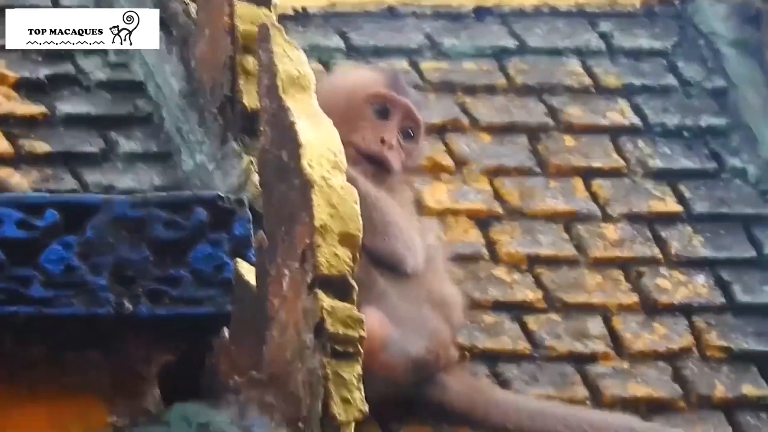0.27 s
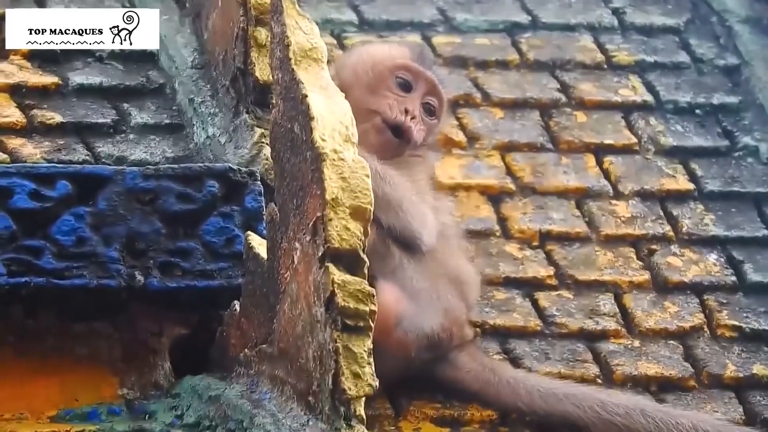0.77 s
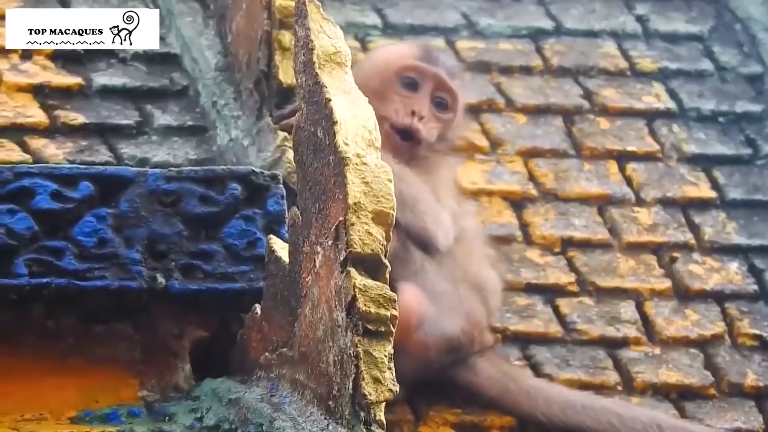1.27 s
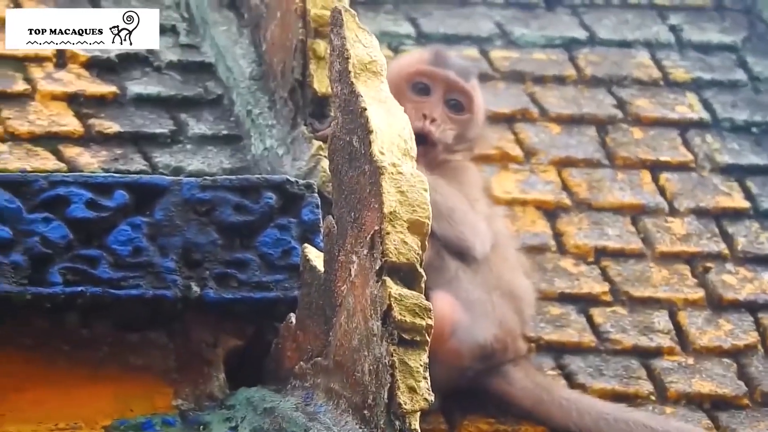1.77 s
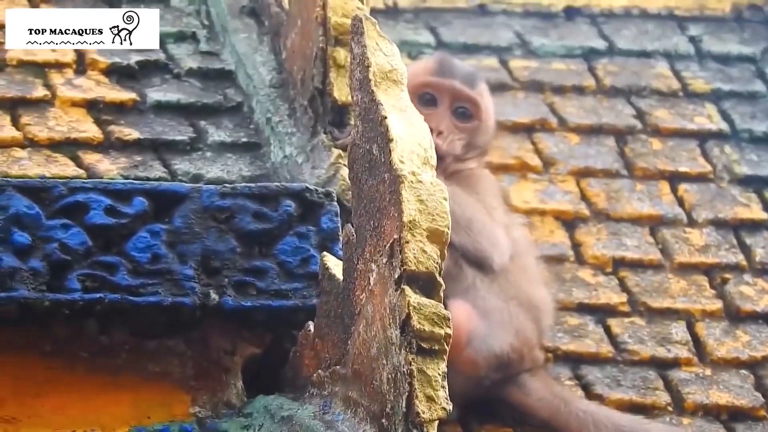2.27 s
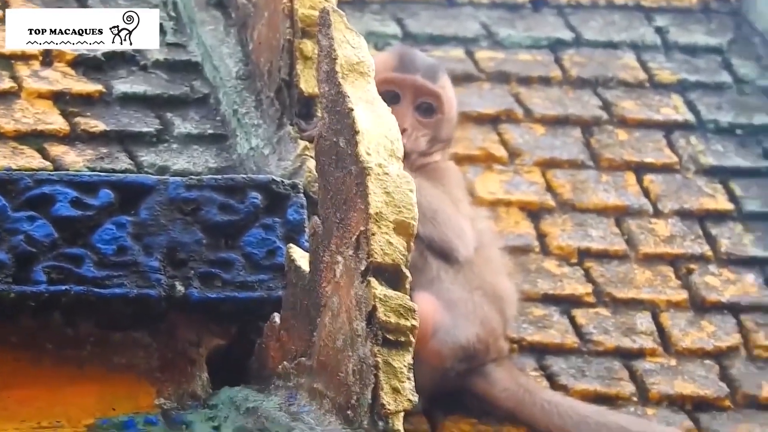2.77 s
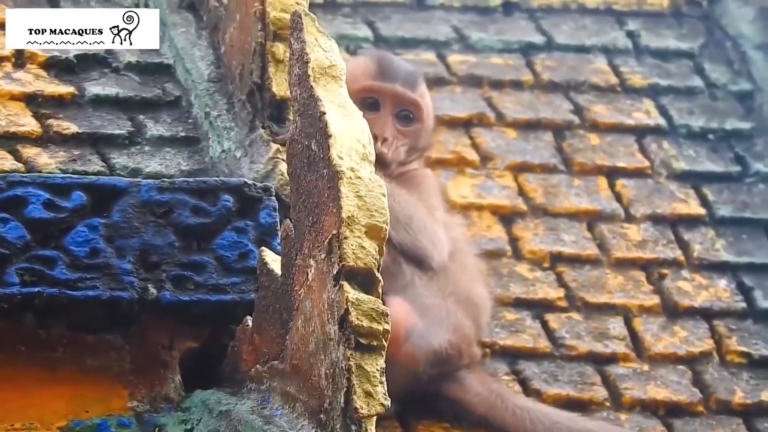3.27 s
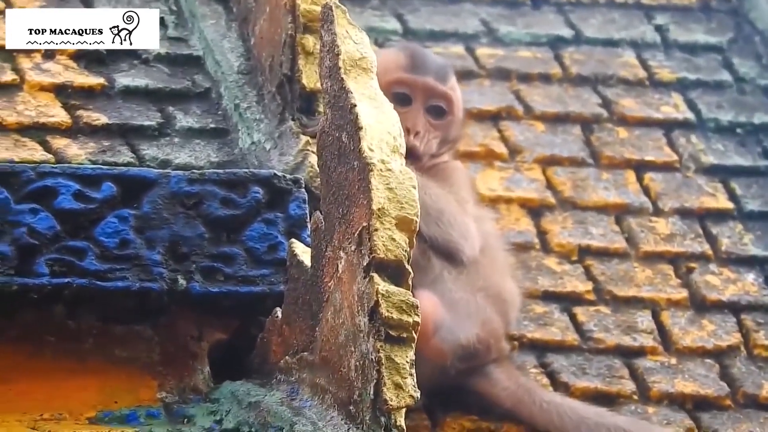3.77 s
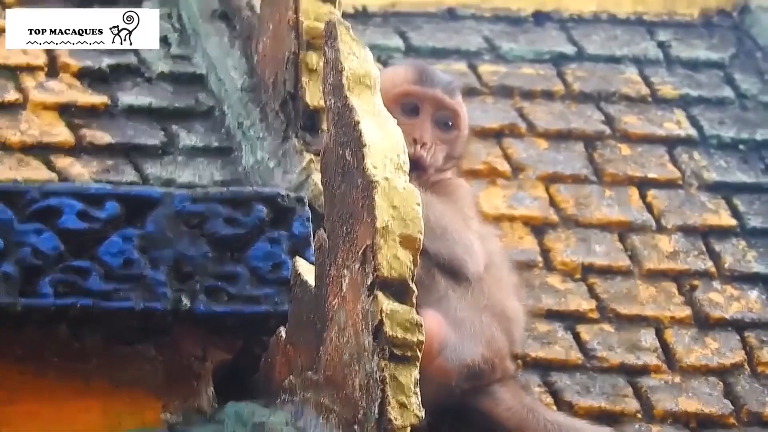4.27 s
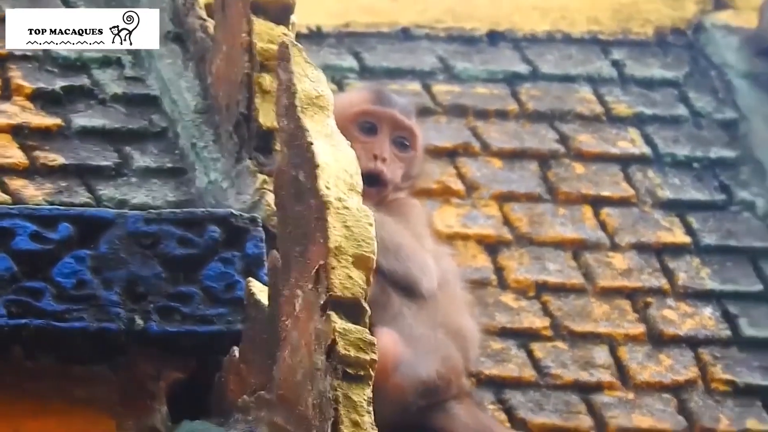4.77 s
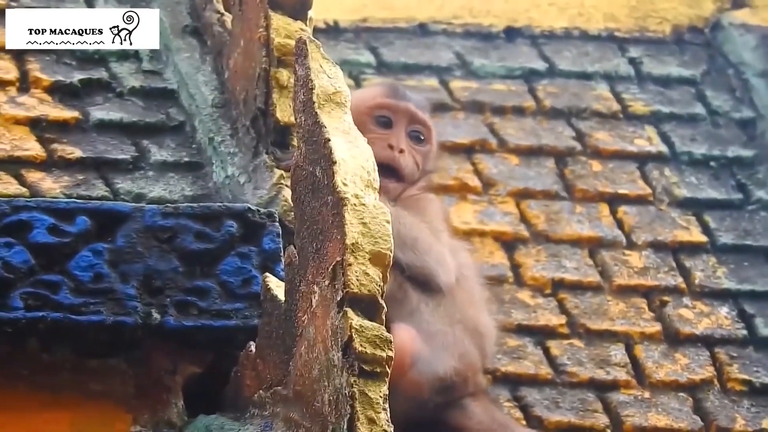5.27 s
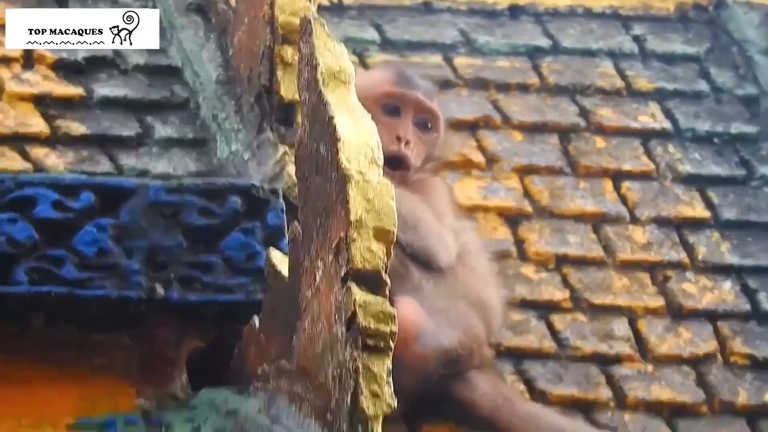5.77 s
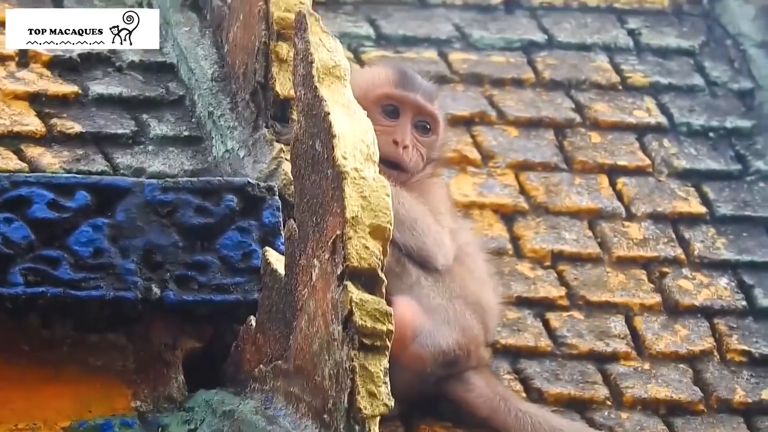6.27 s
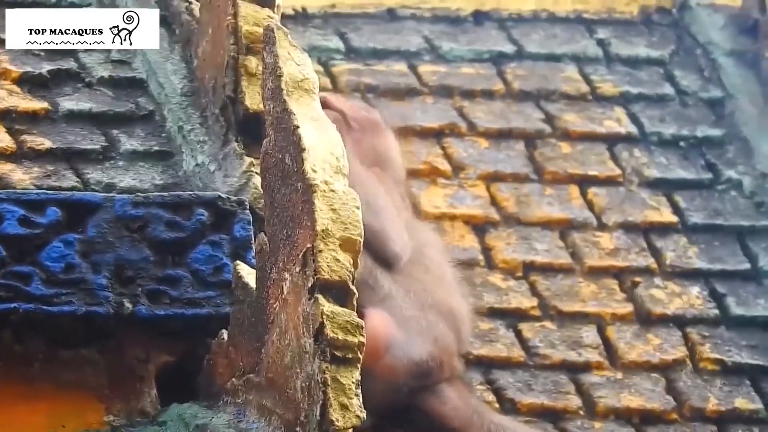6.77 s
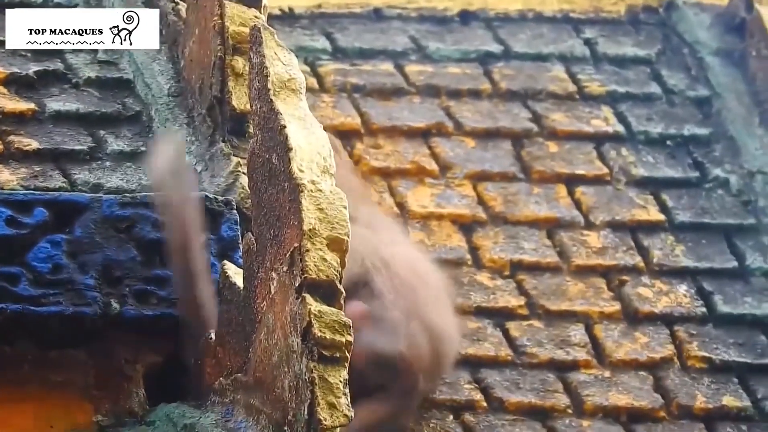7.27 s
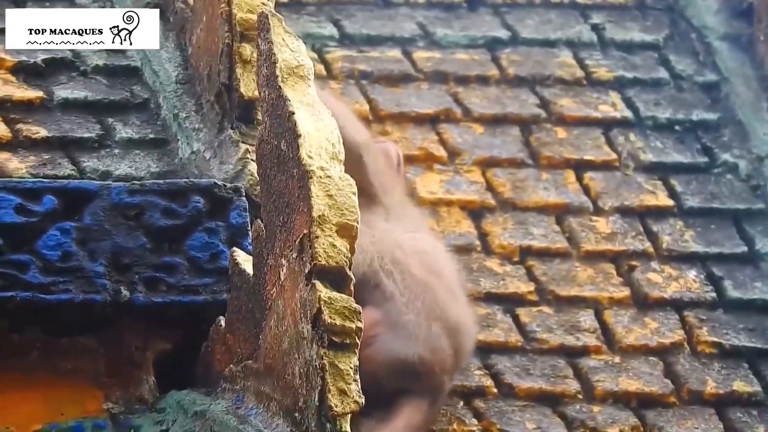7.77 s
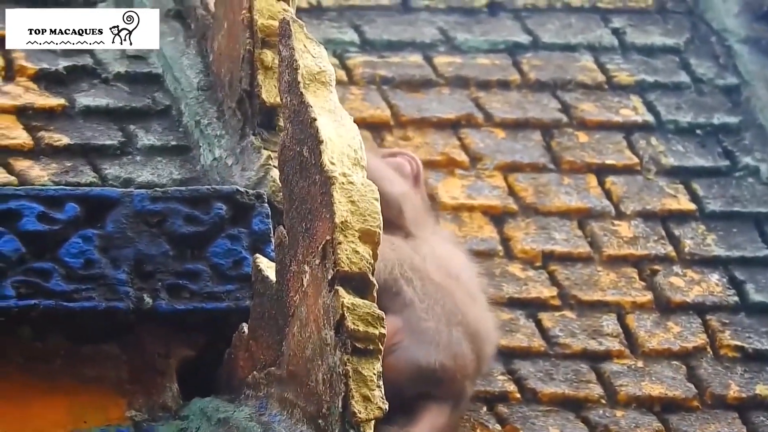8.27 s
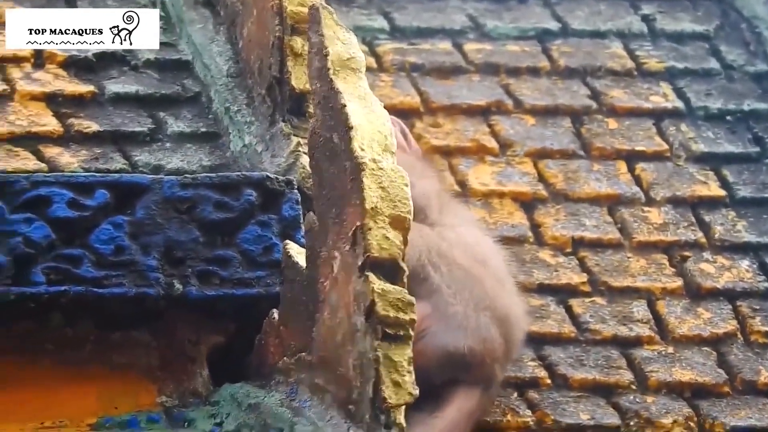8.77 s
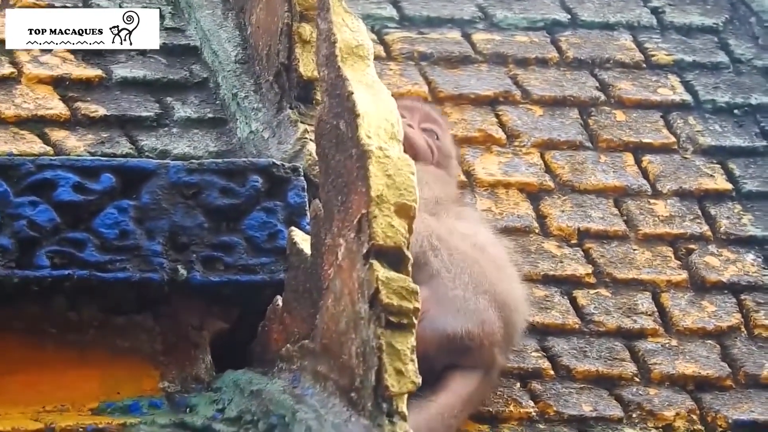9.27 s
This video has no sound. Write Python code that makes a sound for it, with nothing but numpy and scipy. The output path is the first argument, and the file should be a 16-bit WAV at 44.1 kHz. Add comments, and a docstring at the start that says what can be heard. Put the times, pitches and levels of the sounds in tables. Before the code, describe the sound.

A quiet outdoor yard: low soft rumble, faint narrow insect buzz, and a thin chirr fading within the first 0.4 seconds. A weak coo at 0.4 leads to clear, whistle-like monkey coos peaking near 0.85, 1.4, 1.9, 2.5, 3.1, 3.75 and 4.3, each arching up and down around 1.0 to 1.4 kHz with a strong octave overtone and small catches or cracks. Soft dull knocks appear sporadically; a dry tick sounds at 4.3. From 4.7 a strained coo climbs and roughens. At 5.2 to 5.7 the first scream leaps up, tears into hiss and falls hoarse. Airy hisses swell around 6 and 6.6, then a faint coo at 7. Harsh screams with tiny squeaks follow at 7.1, 7.7, 8.3, 8.8 and 9.5, with hissing between. Short echoes and a thin tail surround the calls.

```python
"""A young monkey on a tiled roof calls in arched, whistle-like coos, harmonic tones shaped by its throat,
then breaks into screams: two rough folds leap in pitch, tear into hiss and fall back rough.
Hisses are noise ringing two mouth resonances; squeaks are short glides of the screaming folds.
Insects, narrow throbbing noise bands, buzz over a low rumble, with soft knocks (scuffs ringing
modes) and dry ticks (noise bursts). Echoes and a diffuse tail surround all but this background."""
import sys
import numpy as np
from scipy import signal
from scipy.io import wavfile
from scipy.ndimage import uniform_filter1d

SR = 44100
rng = np.random.default_rng(int(sys.argv[2]) if len(sys.argv) > 2 else 0)


def log_audio(samples):
    """Write samples as a 16-bit WAV file to the path given in sys.argv[1]."""
    # one column per channel
    frames = np.atleast_2d(samples).T
    # limit to full scale, then quantise
    limited = np.clip(frames, -1, 1)
    pcm = np.round(limited * 32767).astype(np.int16)
    wavfile.write(sys.argv[1], SR, pcm)


N = 420273
T = np.arange(N) / SR
CUTOFF_HZ = 15300
FUNDAMENTAL_FADE_DB = 14  # how far a coo's fundamental weakens at its ends

# left-right likeness of a sound: frequency_hz, coherence (0-1)
LIKENESS = [(30, 1), (120, 1), (1000, 0.97), (3000, 1), (6500, 0.66), (9000, 0.8), (12000, 0.17)]


def from_db(db):
    """Level to amplitude: 20 dB is a factor of ten."""
    return 10 ** (np.asarray(db) / 20)


def rms_one(x):
    """Normalization: scale to unit mean power."""
    return x / np.sqrt(np.mean(x ** 2) + 1e-20)


def curves(rows, t):
    """Linear interpolation: each column of a table at the times t."""
    s, *columns = np.transpose(rows)
    return [np.interp(t, s, c) for c in columns]


def between(start, end):
    """Time axis: the sample times from start to end."""
    return T[(T >= start) & (T <= end)]


def ramp(t, start, length_s):
    """Linear onset: 0 before start, rising to 1 over length_s."""
    return np.clip((t - start) / length_s, 0, 1)


def blend(a, b, share):
    """Crossfade: go from a to b as share goes from 0 to 1."""
    return a + (b - a) * share


def span(rows, fade_s):
    """Gating: the samples that a table covers, their times, and a soft gate."""
    at = np.flatnonzero((T >= rows[0][0]) & (T <= rows[-1][0]))
    t = T[at]
    gate = np.clip(np.minimum(t - t[0], t[-1] - t) / fade_s, 0, 1)
    return at, t, gate


def at_hz(points, hz):
    """Spectral envelope: read a spectrum on a log-frequency axis."""
    f, value = np.transpose(points)
    return np.interp(np.log(hz), np.log(f), value)


def lowpass(x, order, hz):
    """Low-pass filtering: treble above hz is weakened."""
    return signal.sosfilt(signal.butter(order, hz, fs=SR, output="sos"), x)


def bandpass(x, order, low_hz, high_hz):
    """Band-pass filtering: only the band between two edges stays strong."""
    return signal.sosfilt(signal.butter(order, [low_hz, high_hz], "band", fs=SR, output="sos"), x)


def wander(rate_hz, size):
    """Random modulation: low-passed noise of unit rms."""
    # the first tenth of a second lets the filter settle
    noise = rng.standard_normal(size + SR // 10)
    return rms_one(lowpass(noise, 2, min(rate_hz, SR / 4))[-size:])


def noise_band(hz, width_hz, shape):
    """Resonance: white noise through one broad band, unit rms."""
    low, high = np.clip([hz - width_hz / 2, hz + width_hz / 2], 10, SR / 2 - 10)
    return rms_one(bandpass(rng.standard_normal(shape), 2, low, high))


def widen(mid, side, hz):
    """Interaural coherence: two unrelated sounds become partly alike left and right signals."""
    alike = np.clip(at_hz(LIKENESS, hz), 0, .985)
    return np.sqrt((1 + alike) / 2) * mid + np.sqrt((1 - alike) / 2) * side * np.array([[1], [-1]])


def coloured_noise(spectrum, patchy_db, patchy_hz, count):
    """Filter bank: stereo noise bands follow a spectrum, each flickering by itself; unit rms."""
    edges = np.geomspace(spectrum[0][0], min(spectrum[-1][0], CUTOFF_HZ), count)
    white = rng.standard_normal((2, 2, N))
    out = 0
    for k, (low, high) in enumerate(zip(edges, edges[1:])):
        hz = np.sqrt(low * high)
        # neighbouring bands draw on different noise
        band = bandpass(white[k % 2], 3, low, high)
        gains = from_db(at_hz(spectrum, hz) + patchy_db * rng.standard_normal(size=4096))
        flicker = np.interp(T * patchy_hz, np.arange(len(gains)), gains)
        out = out + flicker * widen(*band, hz)
    return rms_one(out)


def partial(phase, hz, spread=0.49):
    """Interaural phase: one sine at both ears, skewed further where the ears are less alike."""
    skew = spread * np.arccos(np.clip(at_hz(LIKENESS, hz), 0, 1)) / 2
    return np.array([np.sin(phase + skew), np.sin(phase - skew)])


def rumble(level_db=-46):
    """Broadband noise: the outdoor ambience is strongest in the bass."""
    # steady background spectrum: frequency_hz, relative_density_db (per Hz)
    ambience = [(25, -36.5), (42, -15), (64, -6.5), (105, -2), (170, -7), (260, -12), (460, -15.5),
                (760, -25.5), (1000, -22), (1600, -34.5), (2800, -36.5), (4400, -46)]
    return from_db(level_db) * coloured_noise(ambience, patchy_db=4.5, patchy_hz=14, count=26)


def high_air(level_db=-65):
    """Broadband noise: a faint, steady treble band."""
    return from_db(level_db) * widen(*noise_band(5100, 6000, (2, N)), 5500)


def chorus(hz, width_hz, level_db, throb_db=1.0):
    """Incoherent superposition: many small sounds merge into one narrow, throbbing noise band."""
    throb = from_db(level_db + throb_db * wander(37, N))
    return throb * widen(*noise_band(hz, width_hz, (2, N)), hz)


def insects():
    """Incoherent superposition: a high chorus keeps on while a lower one swells and sinks."""
    # level of the lower chorus: time_s, level_db
    low_swell = [(0, -58.5), (.9, -59), (1.1, -68.5), (2.8, -71), (3.1, -53.5), (3.4, -65.5), (4.3, -59),
                 (4.7, -79)]
    high = chorus(hz=6583, width_hz=486, level_db=-51.5)
    low = chorus(hz=5020, width_hz=610, level_db=0) * from_db(curves(low_swell, T)[0])
    return high + low


def chirr():
    """Band-limited noise: a thin chirr in two bands fades away."""
    # bands of the chirr: centre_hz, width_hz, relative_level_db
    chirr_bands = [(3650, 640, -1), (7900, 1700, -11)]
    # fading of the chirr: time_s, level_db
    chirr_fade = [(0, -38), (0.081, -51.5), (.2, -62.5), (.4, -90)]
    return sum(chorus(*band) for band in chirr_bands) * from_db(curves(chirr_fade, T)[0])


def background():
    """Superposition: far rumble, a little high air, the insects and the chirr."""
    return rumble() + high_air() + insects() + chirr()


def burst(s, t60):
    """Exponential decay: an envelope jumps up at s and falls 60 dB in t60 seconds."""
    return (T >= s) * from_db(-60 * np.clip((T - s) / t60, 0, 2))


def knocks(scuff_t60=0.11, scuff_db=4.5, modes_db=3.5):
    """Modal synthesis: each knock is a short, dull scuff that rings a few damped modes."""
    # soft knocks, and one faint low puff at 6.37 s made the same way: start_s, relative_level_db
    knock_times = [(0.17, -42), (0.865, -39.5), (0.972, -46), (1.207, -41.5), (1.241, -37.5),
                   (1.864, -37.5), (2.388, -44), (5.38, -43), (6.371, -49.5), (6.525, -50.5), (7.16, -42.5),
                   (9.064, -42.5)]
    # modes that ring: frequency_hz, relative_level_db, t60_s
    knock_modes = [(335, -5, 0.055), (488, 1.5, 0.034), (695, -7.5, 0.063), (953, -6, 0.049),
                   (1120, 10.5, 0.0036), (1486, -7.5, 0.11), (1974, -17.5, 0.24)]
    envelope = sum(from_db(db) * burst(s, scuff_t60) for s, db in knock_times)
    contact = envelope * rng.standard_normal(N)
    out = from_db(scuff_db) * bandpass(contact, 2, 300, 1900)
    # a longer scuff would drive the modes harder, so its length is divided out
    drive = contact / np.sqrt(scuff_t60 * SR / np.log(1e6))
    for hz, db, t60 in knock_modes:
        radius, angle = from_db(-60 / (t60 * SR)), 2 * np.pi * hz / SR
        resonator = [1, -2 * radius * np.cos(angle), radius * radius]
        ring = signal.lfilter([0, np.sin(angle)], resonator, drive + 1e-18)
        out = out + from_db(db + modes_db) * ring
    return out


def arch(start, top, end, start_hz, top_hz, end_hz, level_db, swell_db, first_db, dip_db, overtones_db,
         mouth):
    """Vocal effort: it rises and slackens, and pitch and level follow it.

    Columns: time_s, pitch_hz, second_harmonic_db, fundamental_db, overtones_db, mouth (0-1), roughness (0-1)."""
    t = between(start, end)
    away = np.where(t < top, (top - t) / (top - start), (t - top) / (end - top))
    # a rounded top with steep ends
    slack = blend(away ** 7.3, away ** 1.7, 0.65)
    pitch = blend(top_hz, np.where(t < top, start_hz, end_hz), slack)
    dip = dip_db * np.exp(-(slack / 0.062) ** 2)
    fundamental_db = first_db - FUNDAMENTAL_FADE_DB * slack ** 2 - dip
    # the coo dies away as the breath runs out
    release_s, release_db = 0.03, 16.5
    second_db = level_db - swell_db * slack - release_db * ramp(t, end - release_s, release_s)
    columns = t, pitch, second_db, fundamental_db, overtones_db, mouth, 0
    return np.column_stack(np.broadcast_arrays(*columns))


def coo(rows, shimmer_db=2.0):
    """Source and filter: the throat resonance favours the second harmonic; strain adds side tones."""
    # throat shape in a coo: frequency_hz, gain_db
    coo_throat = [(2000, 2), (2400, 10), (2800, 14.5), (3300, 8.5), (3700, -15), (4200, -17.5), (5400, -26),
                  (6100, -22), (6800, -11), (8200, -36.5), (10500, -37), (12300, -33.5), (14000, -58)]
    at, t, gate = span(rows, fade_s=.014)
    size = len(t)
    pitch, second_db, first_db, overtones_db, mouth, rough = curves(rows, t)
    # under strain the folds wobble every few cycles
    flutter_hz = 0.28 * pitch * (1 + 0.09 * wander(200, size))
    flutter = rough * np.sin(2 * np.pi * np.cumsum(flutter_hz) / SR)
    bent = pitch * (1 + 0.0036 * wander(110, size) + 0.14 * flutter)
    phase = 2 * np.pi * np.cumsum(bent) / SR
    tone = from_db(first_db + 4.0 * wander(19, size)) * partial(phase, pitch)
    # near the top of the arch, fold tension tilts the overtones
    tilt_db = -np.log2(np.clip(pitch, 1300, 1440) / 1380)
    for k in range(2, 11):
        # a half-closed mouth flattens the resonances; higher harmonics waver more
        throat_db = mouth * (at_hz(coo_throat, k * pitch) - at_hz(coo_throat, 2 * pitch))
        waver_db = shimmer_db * (k / 2) ** 0.54 * wander(19, size)
        level_db = second_db + throat_db + waver_db + overtones_db * (k > 2) + tilt_db * np.log2(k / 2)
        tone += from_db(level_db) * partial(k * phase, k * pitch)
    # strain also brings a line between the first two harmonics, and irregular snaps
    half_line = partial(1.5 * phase, 1.5 * pitch)
    tone += from_db(second_db) * rough * from_db(-13) * (half_line + breaks(size))
    return at, np.sqrt(2) * gate * tone * (1 + 0.4 * flutter)


def catch(start, end, from_hz, to_hz, level_db, swell_db=12, jitter=0.013, shimmer_db=3.0):
    """Period doubling: strong and weak cycles alternate, giving lines at half multiples of the pitch."""
    # throat shape as the voice catches: frequency_hz, gain_db
    catch_throat = [(1050, -7), (1600, -15), (2100, -6.5), (2700, -1.5), (3200, 1), (3700, -25),
                    (4400, -23)]
    rows = [(start, from_hz, level_db - swell_db), (end, to_hz, level_db)]
    at, t, gate = span(rows, fade_s=.004)
    pitch, db = curves(rows, t)
    phase = 2 * np.pi * np.cumsum(pitch * (1 + jitter * wander(120, len(t)))) / SR
    tone = 0
    for k in np.arange(2, 10) / 2:
        line_db = db + at_hz(catch_throat, k * pitch) + shimmer_db * wander(58, len(t))
        tone = tone + from_db(line_db) * partial(k * phase, k * pitch)
    return at, gate, np.sqrt(2) * gate * tone


def ticks(hz=5500, width_hz=5000, top_hz=9500, crack_t60=0.006, tail_t60=0.33, tail_db=-14):
    """Impulsive excitation: a bright, very short noise burst with a faint tail."""
    # dry ticks: start_s, relative_level_db
    tick_times = [(1.597, -42), (4.305, -21), (4.498, -43)]
    envelope = 0
    for s, db in tick_times:
        envelope = envelope + from_db(db) * (burst(s, crack_t60) + from_db(tail_db) * burst(s, tail_t60))
    return lowpass(envelope * widen(*noise_band(hz, width_hz, (2, N)), hz), 4, top_hz)


def breaks(size, hz=2950, width_hz=750):
    """Resonance under chaotic drive: irregular snaps of the folds, as noise, ring the throat."""
    return widen(*noise_band(hz, width_hz, (2, size)), hz)


def crack(start, end, hz, width_hz, level_db):
    """Chaotic vibration: for a moment the folds snap irregularly and ring the throat resonance."""
    at, t, gate = span([(start,), (end,)], fade_s=.005)
    return at, from_db(level_db) * gate * breaks(len(t), hz, width_hz)


def strain(attack_s=0.088):
    """Nonlinear phonation: a strained coo turns rough part way through; same columns as an arch."""
    # the coo that climbs out of the arch: time_s, pitch_hz, second_harmonic_db
    strained_coo = [(4.679, 1008, -56), (4.72, 1220, -40.5), (4.799, 1327, -26), (4.828, 1446, -23.5),
                    (4.884, 1467, -23), (4.92, 1524, -22.5), (4.944, 1622, -25), (4.983, 1650, -23),
                    (5.012, 1572, -22.5), (5.039, 1293, -32.5), (5.05, 1340, -34)]
    start, end = strained_coo[0][0], strained_coo[-1][0]
    t = between(start, end)
    pitch, second_db = curves(strained_coo, t)
    fundamental_db = -44 - FUNDAMENTAL_FADE_DB * (1 - ramp(t, start, attack_s)) ** 2
    rough = 0.14 * ramp(t, 4.8, 0.078)
    return np.column_stack(np.broadcast_arrays(t, pitch, second_db, fundamental_db, 0, 1, rough))


def cooing():
    """Voice registers: clear coos give way to a doubled vibration wherever the voice catches."""
    # arched coos: start_s, top_s, end_s, start_hz, top_hz, end_hz, second_harmonic_db, its swell_db,
    #   fundamental_db, its dip_db at the top, overtones_db, mouth opening (0-1)
    coos = [ (0.365, 0.559, 0.65, 960, 1176, 1153, -46.5, 17, -50.5, 0.5, -9.5, 1),
            (0.639, 0.848, 1.047, 1196, 1336, 1020, -24.5, 35, -43.5, 2.5, 0.5, 0.94),
            (1.222, 1.395, 1.585, 1070, 1381, 1072, -24.5, 23.5, -39.5, 27, -1, 0.81),
            (1.742, 1.941, 2.098, 1080, 1423, 1050, -21.5, 27.5, -43, 1, 2.5, 0.95),
            (2.263, 2.489, 2.667, 1040, 1416, 1065, -24, 29, -42, 1.5, 10.5, 1),
            (2.841, 3.119, 3.277, 1082, 1354, 1100, -25, 26.5, -43.5, -4.5, 7.5, 1),
            (3.458, 3.757, 3.9, 1067, 1391, 1055, -23, 30.5, -40.5, 13, 2.5, 0.94),
            (4.096, 4.328, 4.505, 1015, 1350, 1120, -25.5, 25, -41, -3, -0.5, 0.91),
            (6.897, 7.005, 7.08, 1000, 1211, 1240, -45, 24, -49.5, 10, 1, 0.72),
            (7.051, 7.103, 7.125, 1183, 1330, 1500, -52.5, -6, -44.5, 15, -1, 0.8), ]
    # the voice catches at the start of a coo: start_s, end_s, from_hz, to_hz, level_db
    catches = [(1.229, 1.262, 1053, 1200, -37), (2.255, 2.31, 1020, 1206, -39.5),
               (2.845, 2.906, 1032, 1196, -41), (3.457, 3.53, 1038, 1103, -40),
               (4.091, 4.166, 1036, 1065, -40)]
    # the voice cracks: start_s, end_s, centre_hz, width_hz, level_db
    cracks = [(2.38, 2.415, 3250, 250, -47), (2.934, 2.964, 3150, 300, -41), (2.977, 3.002, 3220, 250, -42),
              (3.501, 3.55, 2780, 744, -41.5), (3.578, 3.586, 3120, 300, -35),
              (4.127, 4.163, 2870, 647, -42), (4.207, 4.222, 3130, 250, -41.5)]
    # left-right balance of the coos: time_s, left_minus_right_db
    coo_balance = [(0.85, 1), (1.4, 1), (1.93, -0.7), (2.48, 0), (3.1, 1), (3.7, 0.5), (4.3, 0), (4.9, 0)]
    out = np.zeros((2, N))
    for at, sound in [coo(arch(*row)) for row in coos] + [coo(strain(), shimmer_db=1.7)]:
        out[:, at] += sound
    for row in catches:
        at, gate, sound = catch(*row)
        out[:, at] = (1 - gate) * out[:, at] + sound
    for row in cracks:
        at, sound = crack(*row)
        out[:, at] += sound
    return out * from_db(curves(coo_balance, T)[0] * np.array([[.5], [-.5]]))


def hissing(lower_width_hz=600, upper_width_hz=1000, swing_db=37.5):
    """Turbulence: air rushes through the open mouth and rings two resonances that shift by grimace."""
    # voiceless hisses: peak_s, rise_s, fall_s, lower_resonance_hz, its level_db,
    #   upper_resonance_hz, its level_db, broad_rush_db
    hisses = [ (5.02, 0.19, 0.31, 3100, -42.5, 7500, -54, -47),
              (5.66, 0.036, 0.94, 3090, -43, 8000, -41.5, -40.5),
              (5.994, 0.66, 0.28, 3440, -59, 6780, -32, -36.5),
              (6.05, 0.28, 0.31, 3740, -36, 6300, -36.5, -35.5),
              (6.601, 0.33, 0.28, 3300, -51, 7170, -36, -43.5),
              (7.46, 0.028, 0.49, 4540, -50, 7200, -48, -51),
              (8.08, 0.076, 0.61, 3000, -43.5, 6500, -50, -37),
              (8.209, 0.73, 0.52, 2950, -46, 6600, -34, -39),
              (8.61, 0.25, 0.47, 2870, -44, 6930, -33.5, -35.5),
              (8.785, 0.12, 0.39, 3040, -38.5, 7400, -35, -33),
              (9.179, 0.12, 0.38, 3660, -45, 7500, -35.5, -35),
              (9.42, 0.96, 0.094, 3670, -46, 7240, -47, -41.5), ]
    # air noise in the mouth: frequency_hz, relative_density_db (per Hz)
    hiss_air = [(700, -37), (1400, -11), (2500, -10.5), (3300, -4), (4500, 2), (6000, 2.5), (8000, 0),
                (9500, -5.5), (11500, -20), (15000, -31)]
    out, rush_gain = np.zeros((2, N)), np.zeros(N)
    for peak, rise_s, fall_s, lower_hz, lower_db, upper_hz, upper_db, rush_db in hisses:
        at, t, gate = span([(peak - rise_s,), (peak + fall_s,)], fade_s=.005)
        # the level swings by swing_db over one rise or fall time
        swell = gate * from_db(-swing_db * np.maximum((peak - t) / rise_s, (t - peak) / fall_s))
        # where hisses overlap, the stronger rush wins
        rush_gain[at] = np.maximum(rush_gain[at], from_db(rush_db) * swell)
        resonances = (lower_hz, lower_width_hz, lower_db), (upper_hz, upper_width_hz, upper_db)
        for hz, width_hz, db in resonances:
            out[:, at] += from_db(db) * swell * widen(*noise_band(hz, width_hz, (2, len(t))), hz)
    return out + rush_gain * coloured_noise(hiss_air, patchy_db=2.5, patchy_hz=59.6, count=20)


def scream_course(start, leap, drop, end, attack_s, glide_s, from_hz, to_hz, open_rough, open_db,
                  leap_s, tear_s, top_hz, shriek_rough, shriek_db, build_s, whistle_hz, whistle_db,
                  fall_hz, fall_rough, fall_hiss, fall_db):
    """Register leap: a tonal opening jumps to a hissing shriek, then drops to a rough fall.

    Columns: time_s, pitch_hz, roughness, hiss_share, level_db, whistle_hz, whistle_db, mouth_closure."""
    drop_s, clear_s, roughen_s = 0.0073, 0.037, 0.0394
    t = between(start, end)
    since_leap, since_drop = np.maximum(t - leap, 0), np.maximum(t - drop, 0)
    opened = ramp(t, start, glide_s)
    leapt = 1 - np.exp(-since_leap / leap_s)
    torn = ramp(t, leap, tear_s)
    dropped = ramp(t, drop - drop_s, drop_s)

    # pitch: after the leap it sags, after the drop it sinks (Hz per second)
    opening_hz = from_hz * (to_hz / from_hz) ** opened
    pitch = blend(opening_hz, top_hz - 6700 * since_leap, leapt)
    pitch = blend(pitch, fall_hz - 10000 * since_drop, dropped)

    # roughness grows as the shriek tears
    rough = blend(open_rough * opened, shriek_rough + 0.3 * torn ** 2, leapt)
    rough = blend(rough, fall_rough, ramp(t, drop - drop_s, roughen_s))

    # part of the flow turns to hiss at the leap, most of it as the tone tears; the fall clears
    hiss = blend(0.012 + 0.12 * ramp(t, leap, drop_s), 0.83, torn ** 2)
    hiss = blend(hiss, fall_hiss, ramp(t, drop - drop_s, clear_s))

    # the opening is weak until its pitch reaches the throat resonance, and flares at the sharpest one
    weak_db = 11 * np.minimum(np.log2(opening_hz / 2300), 0)
    flare_db = np.exp(-((opening_hz - 3260) / 130) ** 2)
    level_db = blend(open_db + flare_db + weak_db, shriek_db, torn)
    # the level moves towards the fall's own already ahead of the drop
    level_db = blend(level_db, fall_db, np.exp(np.minimum(t - drop, 0) / build_s))
    release_s, release_db, attack_db = 0.027, 23, 8.5
    level_db -= release_db * ramp(t, end - release_s, release_s)
    level_db -= attack_db * (1 - ramp(t, start, attack_s))

    mouth_closure = ramp(t, drop, 0.01)
    columns = t, pitch, rough, hiss, level_db, whistle_hz, whistle_db, mouth_closure
    return np.column_stack(np.broadcast_arrays(*columns))


def slips(rate_hz, size):
    """Random telegraph process: a chance value holds, then jumps to another, slightly smoothed."""
    jumps = np.cumsum(rng.random(size) < rate_hz / SR)
    values = np.clip(rng.standard_normal(size + 1), -2, 2)
    return uniform_filter1d(values[jumps], size=64)


def fold(pitch, rough, chaos=0.0775, lurch=0.065, tilt_db=-11):
    """Source and filter: one fold lurches and jitters as it roughens; the throat shapes its harmonics."""
    # throat shape in a scream: frequency_hz, gain_db
    scream_throat = [(1000, 15), (1700, -12.5), (2400, 28.5), (3900, 17), (5200, 0.5), (7400, 16),
                     (9000, -7.5), (10300, -3), (11300, -63), (15000, -28)]
    size = len(pitch)
    unsteady = chaos * wander(700, size) + lurch * slips(130, size)
    # above 5 kHz tighter folds jitter no further in Hz
    bent = pitch + np.minimum(pitch, 5000) * rough * unsteady
    phase = 2 * np.pi * np.cumsum(bent) / SR
    tone = 0
    for k in range(1, 8):
        gain = from_db(at_hz(scream_throat, k * pitch) + tilt_db * np.log2(k)) * (k * pitch < CUTOFF_HZ)
        tone = tone + gain * partial(k * phase, k * pitch)
    return tone


def whistle(size, hz, swing, rate_hz):
    """Frequency modulation: a tone darts at random about its centre; rms near 1."""
    darting_hz = hz * (1 + swing * np.clip(wander(rate_hz, size), -2, 2))
    return np.sqrt(2) * partial(2 * np.pi * np.cumsum(darting_hz) / SR, darting_hz)


def scream(rows, air):
    """Biphonation: overblown folds sound two rough pitches, and part of the flow becomes hiss."""
    at, t, gate = span(rows, fade_s=.003)
    size = len(t)
    pitch, rough, hiss, level_db, whistle_hz, whistle_db, closed = curves(rows, t)
    rough, hiss = np.clip(rough, 0, 1), np.clip(hiss, 0, 1)
    pitch = pitch * (1 + 0.01603 * wander(60, size))
    # the two folds part in pitch only below 6 kHz
    second_pitch = pitch * (1 + 0.2 * rough * (pitch < 6000))
    tone = fold(pitch, rough) + 0.41 * rough * fold(second_pitch, rough)
    rasp = wander(220, size)
    tone = tone * from_db(4.5 * np.sqrt(rough) * rasp)
    # even out the power over about 9 ms, then let the level quaver
    tone /= np.sqrt(uniform_filter1d(np.mean(tone ** 2, axis=0), size=SR // 110) + 1e-12)
    tone *= from_db(2.6 * np.clip(wander(75, size), -2, 1))
    # shrill whistles dart about inside the hiss and tear it into streaks
    low_whistle = from_db(whistle_db) * whistle(size, whistle_hz, swing=0.0533, rate_hz=327)
    high_whistle = from_db(-14) * whistle(size, 7360, swing=0.13, rate_hz=130)
    torn = rms_one(air[:, at] + low_whistle + high_whistle) * from_db(0.8 * rasp)
    sound = gate * from_db(level_db) * (np.sqrt(1 - hiss) * tone + np.sqrt(hiss) * torn)
    # in the fall the mouth closes and muffles the top
    closed_mouth = signal.butter(3, 7740, fs=SR, output="sos")
    muffled = signal.sosfiltfilt(closed_mouth, sound, padlen=0)
    return at, blend(sound, muffled, closed)


def squeak_course(start, end, from_hz, to_hz, hiss, level_db):
    """Pitch glide: one short, even slide with the mouth open; same columns as a scream."""
    t = between(start, end)
    pitch = blend(from_hz, to_hz, ramp(t, start, end - start))
    roughness = 0.15
    return np.column_stack(np.broadcast_arrays(t, pitch, roughness, hiss, level_db, pitch, 0, 0))


def screaming():
    """Nonlinear phonation: screams, and short squeaks in and between them, share one torn air noise."""
    # screams: start_s, leap_s, drop_s, end_s;
    #   opening: attack_s, glide_s, from_hz, to_hz, roughness, level_db;
    #   shriek: leap_time_s, tearing_time_s, top_hz, roughness (0-1), level_db,
    #     build_up_s before the drop, low_whistle_hz, low_whistle_db;
    #   rough fall: pitch_hz, roughness (0-1), hiss_share (0-1), level_db
    screams = [ (5.209, 5.333, 5.555, 5.665, 0.046, 0.11, 1072, 2760, 0.11, -24.5, 0.034, 0.16, 10990, 0.12, -45.5, 0.083, 3590, -8, 3260, 0.7, 0.65, -27.5),
               (7.111, 7.193, 7.445, 7.475, 0.034, 0.072, 1400, 4000, 1.05, -27.5, 0.014, 0.04, 9900, 0.16, -36.5, 0.06, 4160, -2, 4450, 0.4, 0.4, -27),
               (7.692, 7.767, 7.98, 8.095, 0.0072, 0.018, 2784, 4100, 0.25, -25, 0.001963, 0.011, 7720, 0.5, -34.5, 0.068, 4130, -3.5, 4173, 0.72, 0.39, -23),
               (8.287, 8.364, 8.497, 8.58, 0.013, 0.025, 2780, 3790, 0, -23.5, 0.024, 0.059, 8900, 0.65, -32.5, 0.014, 3946, -3, 3910, 1, 0.13, -24),
               (8.802, 8.855, 9.068, 9.178, 0.00091, 0.048, 3510, 4314, 0.3, -24.5, 0.014, 0.06, 9500, 0.2, -37, 0.006, 4160, -5, 4190, 0.75, 0.4, -24),
               (9.478, 9.56, 9.7, 9.8, 0.0038, 0.0048, 2200, 3310, 0.02, -23, 0.02, 0.1, 9400, 0.2, -37, 0.01, 4140, -20, 4100, 0.6, 0.1, -23),
               ]
    # squeaks: start_s, end_s, from_hz, to_hz, hiss_share (0-1), level_db
    squeaks = [(5.33, 5.354, 4560, 4980, 0, -30.5), (5.547, 5.586, 3050, 2200, 0.5, -32),
               (5.569, 5.599, 5900, 4300, 0.05, -35), (5.575, 5.592, 8200, 6460, 0, -29),
               (5.584, 5.602, 3290, 2850, 0.14, -26.5), (5.601, 5.63, 2030, 2420, 0.3, -34),
               (5.622, 5.655, 3250, 2395, 0.2, -32), (5.719, 5.768, 2750, 3300, 0.2, -44),
               (7.145, 7.166, 3160, 3900, 0, -30), (7.156, 7.176, 2750, 3380, 0, -24),
               (7.17, 7.199, 3860, 5980, 0.03, -26), (7.198, 7.243, 8950, 10450, 0.02, -31.5),
               (7.437, 7.458, 7130, 6430, 0, -27.5), (7.767, 7.799, 7000, 7900, 0.03, -33.5),
               (7.805, 7.833, 7300, 7800, 0, -39), (7.984, 7.997, 4210, 4180, 0, -24),
               (8.061, 8.076, 3760, 3104, 0, -29), (8.252, 8.281, 2450, 3250, 0.5, -38),
               (8.408, 8.448, 7940, 9100, 0, -31.5), (8.494, 8.512, 4090, 3810, 0, -23.5),
               (8.829, 8.855, 7700, 9000, 0, -34.5), (8.994, 9.021, 4200, 4100, 0, -35.5),
               (9.035, 9.057, 10300, 9100, 0, -37), (9.07, 9.098, 6650, 6380, 0.05, -31.5),
               (9.071, 9.094, 4260, 4100, 0.01, -25.5), (9.435, 9.483, 2100, 2080, 0.2, -45.5),
               (9.437, 9.463, 6700, 5900, 0.05, -35), (9.459, 9.488, 7400, 8400, 0, -32),
               (9.448, 9.486, 3800, 3830, 0.57, -37)]
    # air noise in the mouth: frequency_hz, relative_density_db (per Hz)
    torn_air = [(380, -26), (1000, -21), (1600, -18), (2400, 0.5), (3200, 5), (4100, 14.5), (5200, 13),
                (7000, 17.5), (8900, 15.5), (10000, -6), (11000, -2.5), (15000, -5)]
    out = np.zeros((2, N))
    air = coloured_noise(torn_air, patchy_db=4.5, patchy_hz=90.25, count=36)
    courses = [scream_course(*row) for row in screams] + [squeak_course(*row) for row in squeaks]
    for rows in courses:
        at, sound = scream(rows, air)
        out[:, at] += sound
    return out


def monkey():
    """Superposition: coos, screams and the hoarse hissing between them."""
    return cooing() + hissing() + screaming()


def yard(x, t60_s=0.43, tail_db=-19.5, dull_hz=6000, build_s=0.067):
    """Reverberation: a few distinct echoes, then a thin diffuse tail by convolution."""
    # echoes off roof and walls: left_delay_s, right_delay_s, level_db
    echoes = [(0.019, 0.015, -13.5), (0.046, 0.04, -33)]
    out = x.copy()
    for left_s, right_s, db in echoes:
        delayed = [np.interp(T - lag, T, side, left=0) for lag, side in zip((left_s, right_s), x)]
        out += from_db(db) * np.array(delayed)
    t = T[:SR]
    envelope = from_db(-60 * t / t60_s) * (1 - np.exp(-t / build_s))
    tail = widen(*rng.standard_normal((2, SR)), dull_hz) * envelope
    tail /= np.sqrt(np.sum(tail ** 2) / 2)
    tail = lowpass(tail, 1, dull_hz)
    return out + from_db(tail_db) * signal.fftconvolve(x, tail, axes=1)[:, :N]


def scene():
    """Superposition: the monkey and small noises in the yard, over the background."""
    return yard(monkey() + knocks() + ticks()) + background()


def record(dry):
    """Low-pass filtering: an elliptic filter cuts the top steeply."""
    return signal.sosfilt(signal.ellip(10, .1, 80, CUTOFF_HZ, fs=SR, output="sos"), dry)


dry = scene()
out = record(dry)
log_audio(out)
```